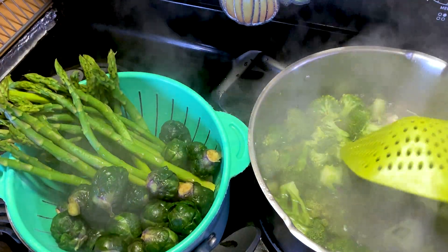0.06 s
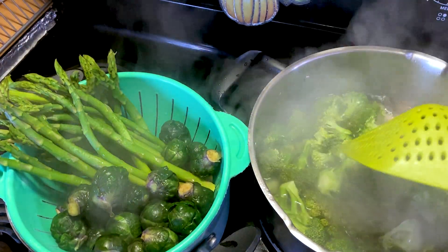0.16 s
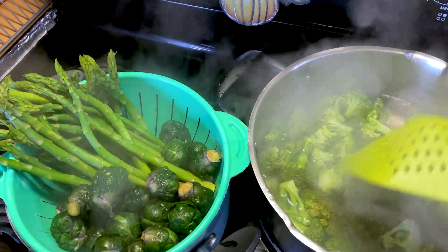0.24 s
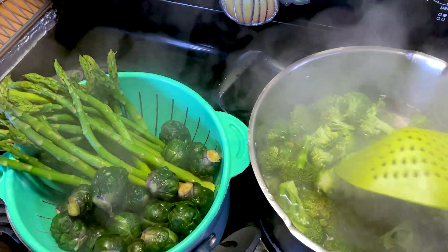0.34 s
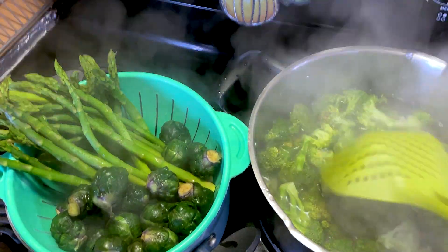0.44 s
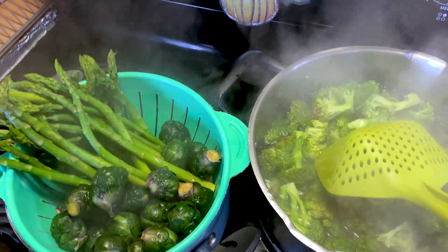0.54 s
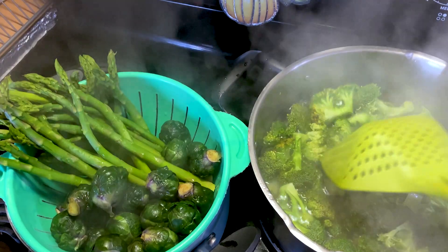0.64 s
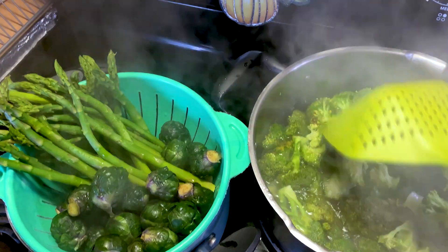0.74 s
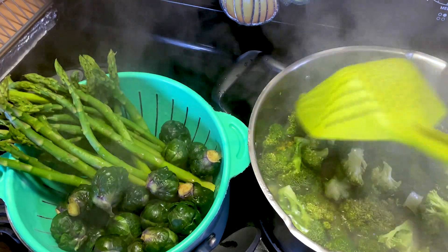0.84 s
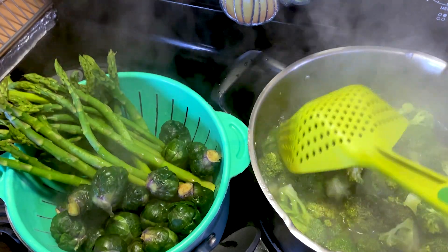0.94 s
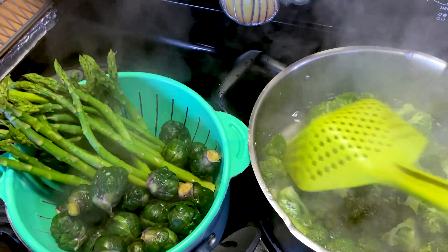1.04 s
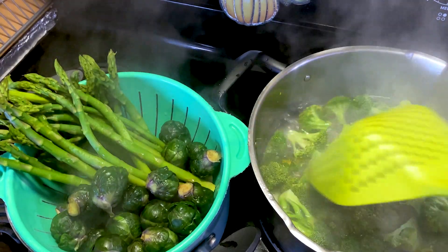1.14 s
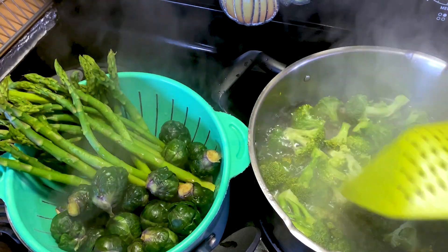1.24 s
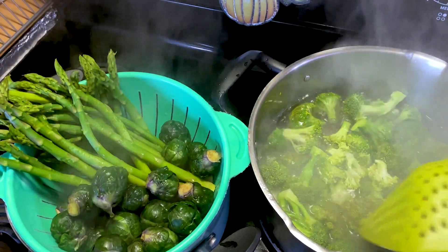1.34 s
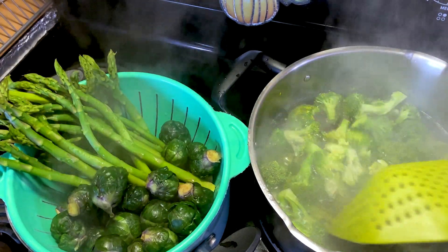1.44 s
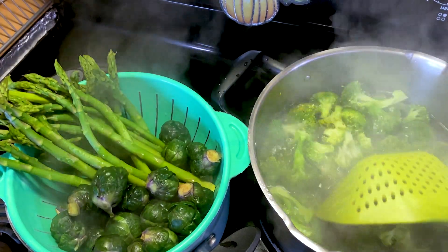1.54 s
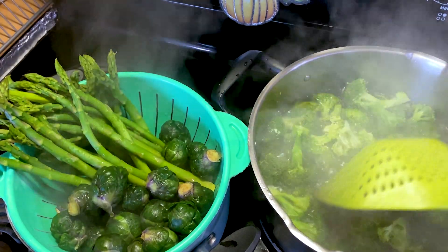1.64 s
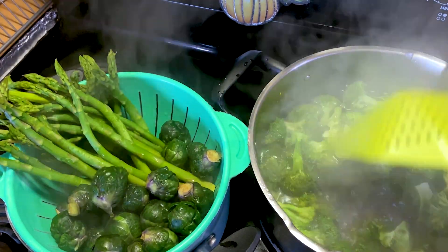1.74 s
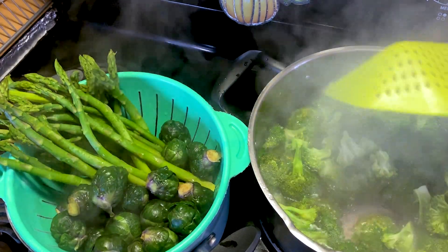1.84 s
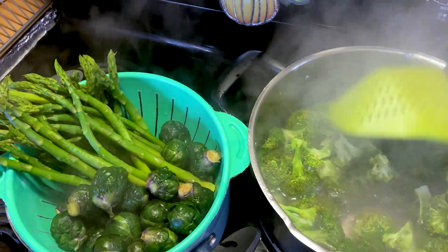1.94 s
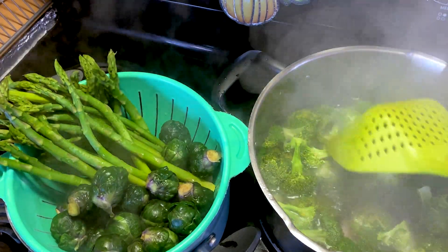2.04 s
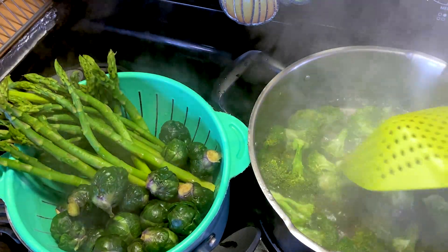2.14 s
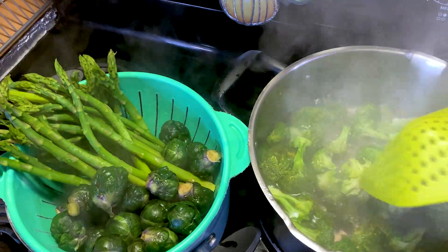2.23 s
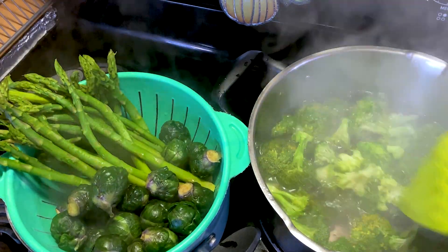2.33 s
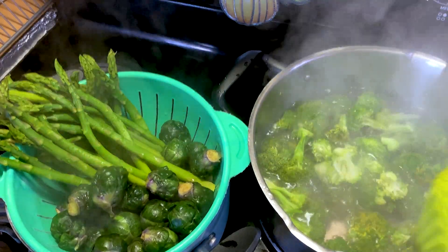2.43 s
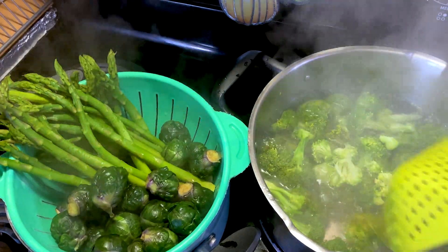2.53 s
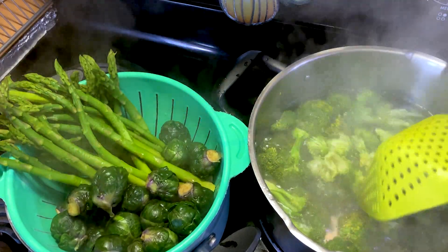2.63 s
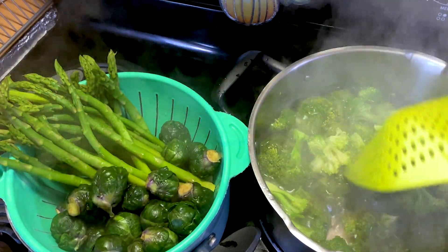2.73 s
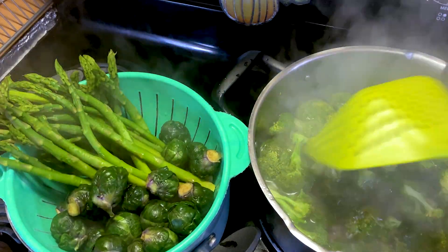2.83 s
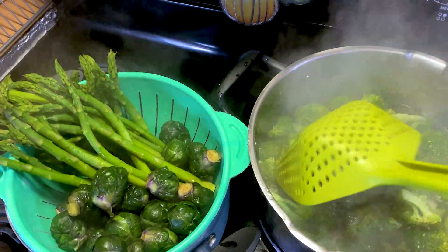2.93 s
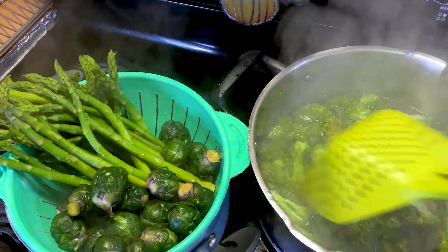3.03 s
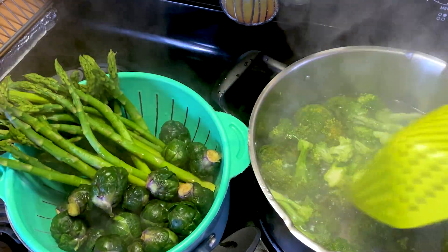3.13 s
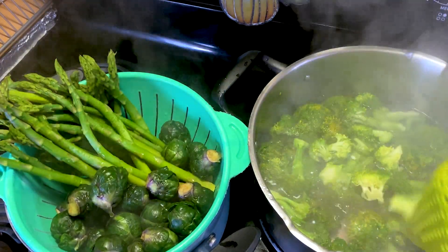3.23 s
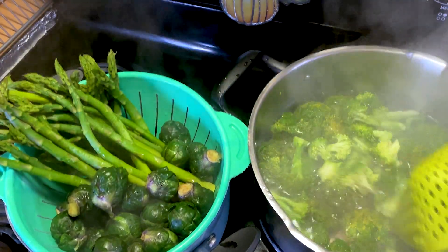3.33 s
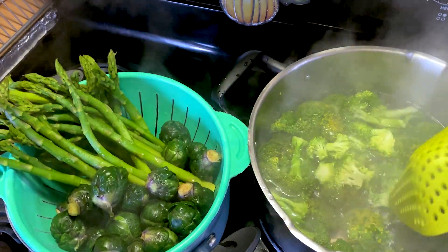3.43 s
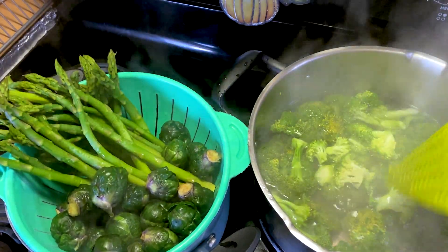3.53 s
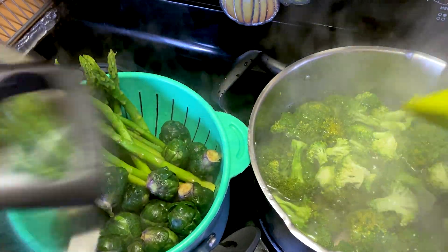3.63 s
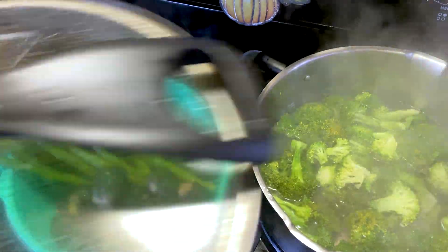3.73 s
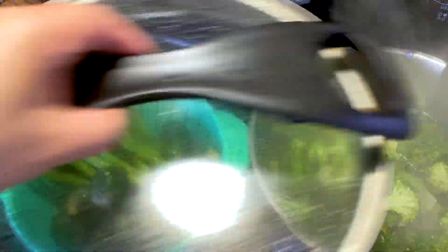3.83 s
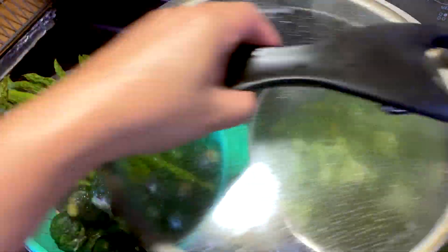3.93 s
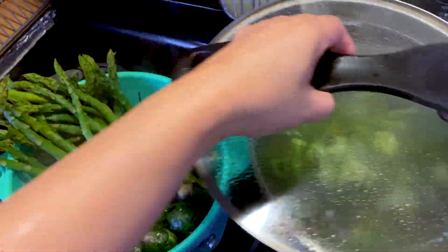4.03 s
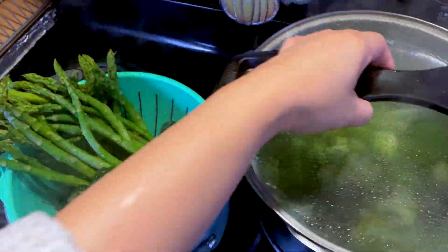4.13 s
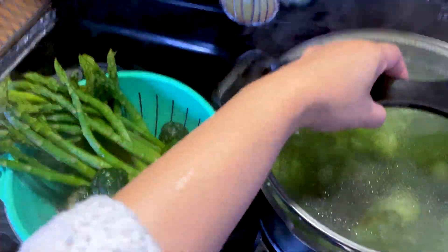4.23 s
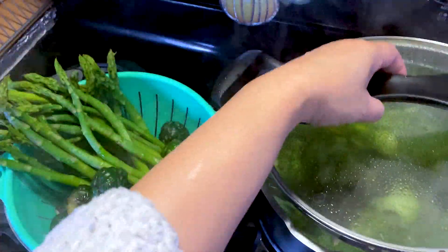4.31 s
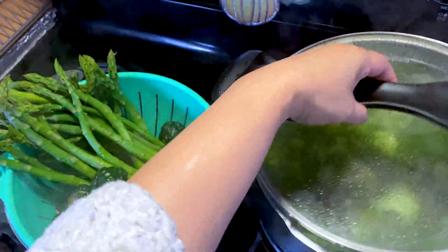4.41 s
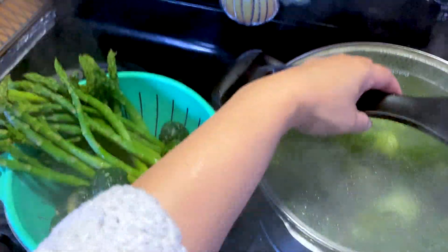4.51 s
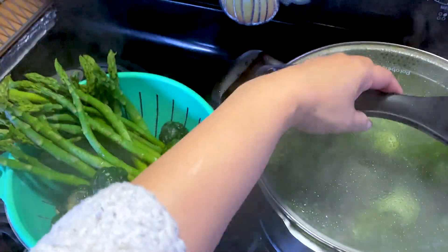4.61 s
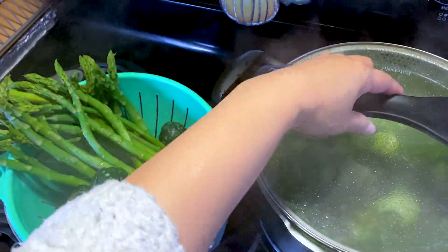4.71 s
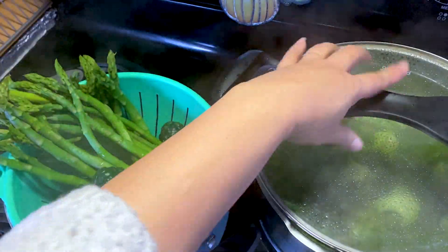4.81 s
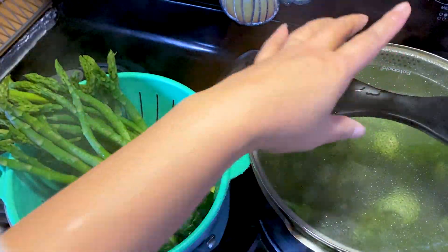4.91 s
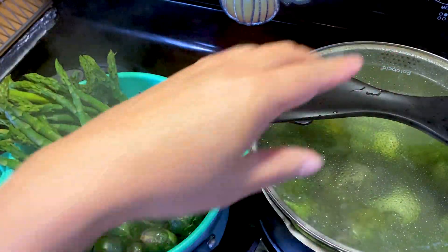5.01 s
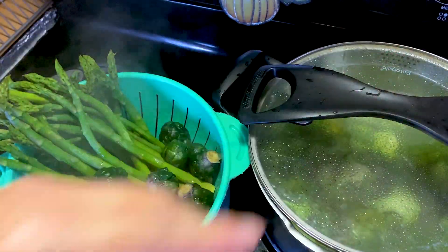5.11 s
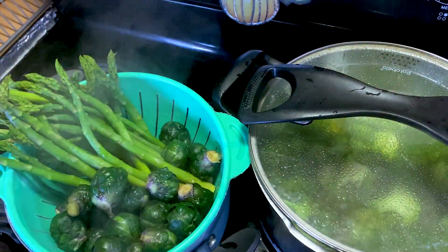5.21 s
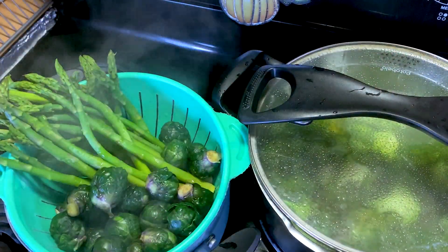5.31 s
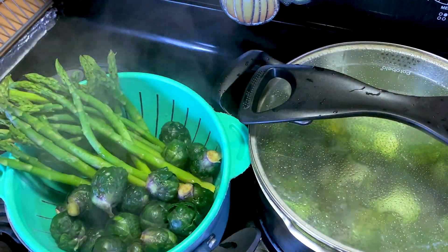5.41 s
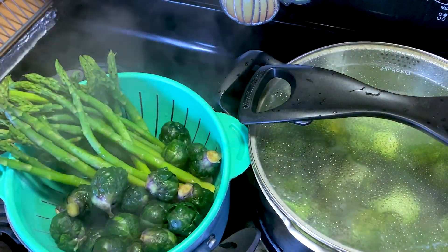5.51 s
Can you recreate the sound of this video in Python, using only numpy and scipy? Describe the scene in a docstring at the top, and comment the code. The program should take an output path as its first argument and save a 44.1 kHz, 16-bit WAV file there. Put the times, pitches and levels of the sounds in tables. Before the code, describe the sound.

A close stereo view of a steel pot simmering on a kitchen stove, with short room reverberation. Water seethes and bubbles throughout with a hollow pot resonance, over a faint low wavering drone; a fine froth fizz on top sinks from about 1.7 s. Tiny droplets spit on hot metal during the first two seconds. A plastic spoon knocks the pot at 0.47 s, then pushes water and rubs the wall with thin squeaks from 0.63 to about 1.2 s. Low glugs bubble around 0.8-1.1 s and again near 1.6 s, with a soft slosh at 1.45 s. Faint metal ticks come at 2.0, 3.0 and 5.5 s. The spoon double-knocks at 2.42 s and knocks once at 3.3 s. A lid clanks on the rim at 4.27 s, grinds at 4.5 s and drops loudly at 4.55 s with rapid weakening rattles. A muffled low rumble joins the slowly strengthening simmer until 5.6 s.

```python
"""Broccoli simmers in a steel pot: resonant bubble bursts, seething noise and, on top, a fizz of froth that sinks.
A plastic straining spoon stirs with shaped noise, squeaks as narrow-band noise and knocks on the pot's modes.
A glass lid lands on the rim, slides as flickering noise and drops into its seat; a resonance rumbles under it.
Hot metal ticks now and then as small modal blows; the stove drones low as coloured noise with two hums."""
import sys
import numpy as np
from scipy import signal
from scipy.fft import rfft, irfft
from scipy.io import wavfile

SR = 44100
rng = np.random.default_rng(int(sys.argv[2]) if len(sys.argv) > 2 else 0)


def generate_wav(sig):
    """Save sig (samples, or channels by samples) to the path in sys.argv[1] as 16-bit PCM at SR."""
    pcm = np.round(np.clip(np.atleast_2d(sig).T, -1, 1) * 32767).astype(np.int16)
    wavfile.write(sys.argv[1], SR, pcm)


N = 245189
TIME = np.arange(N) / SR
SEATED_S = 4.45   # from here on the lid lies in its seat


def from_db(db):
    """Level law: decibels to amplitude gain."""
    return np.exp(np.asarray(db) * (np.log(10) / 20))


def rms_one(x):
    """Normalisation to unit effective value (rms)."""
    return x / np.sqrt(np.mean(x ** 2) + 1e-20)


def level_in_time(rows):
    """Linear interpolation of a level curve, sample by sample."""
    s, db = np.transpose(rows)
    return np.interp(TIME, s, db)


def at_hz(points, hz, axis=1):
    """Interpolation of a spectrum on a logarithmic frequency axis."""
    points = np.array(points)
    return np.interp(np.log(hz), np.log(points[:, 0]), points[:, axis])


def pan(db):
    """Level difference between the channels: positive favours the left."""
    return from_db(np.array([[db], [-db]]) / 2)


def fade(t, t60):
    """Exponential decay: down 60 dB after t60 seconds."""
    return np.exp(-np.log(1000) * t / max(t60, 1e-3))


def add(out, s, sound):
    """Superposition: mix a sound in at time s."""
    start = max(round(s * SR), 0)
    out[:, start:start + sound.shape[-1]] += sound[..., :N - start]


def drift(rate, size=N):
    """Slow random modulation: straight lines between normal draws, rate per second."""
    knots = rng.standard_normal(1024)
    return np.interp(TIME[:size] * rate, np.arange(len(knots)), knots)


def resonate(x, hz, width_hz):
    """Damped resonator: a two-pole filter of unit gain at its peak."""
    r = np.exp(-np.pi * width_hz / SR)
    numerator = np.array([1, 0, -1]) * (1 - r * r) / 2
    denominator = [1, -2 * r * np.cos(2 * np.pi * hz / SR), r * r]
    return signal.lfilter(numerator, denominator, x + 1e-18)


# stereo image: f/Hz, left-right likeness/1, left-over-right level/dB
STEREO_IMAGE = [(40, 0.8, 2), (154, 0.75, -6), (314, 0.9, -2.5), (610, 0.39, -1.5), (1110, 0.28, 1.5),
                (2000, 0.23, -1.5), (4380, 0.088, 3.5), (7600, 0.29, -1.5), (10900, 0.13, -1.5)]
POT_LAG_S, LAG_ABOVE_HZ = 0.00045, 380   # travel time between the microphones, felt above the bass


def spread(pair, hz, from_left=False):
    """Interaural cues: two unrelated signals become left and right by coherence, delay and level."""
    alike = np.clip(at_hz(STEREO_IMAGE, hz), -.98, .98)
    lag = round(POT_LAG_S * SR * hz ** 2 / (hz ** 2 + LAG_ABOVE_HZ ** 2))
    common = np.sqrt(1 + alike) * pair[0]
    opposed = np.sqrt(1 - alike) * pair[1]
    lags = (0, lag) if from_left else (lag, 0)
    delayed = [np.pad(x, (late, 0))[:len(x)] for x, late in zip((common + opposed, common - opposed), lags)]
    return np.array(delayed) * pan(at_hz(STEREO_IMAGE, hz, axis=2))


# half-octave bands, narrowing to a fifth of an octave from 2 kHz
BAND_EDGES = np.concatenate([25 * 2 ** np.arange(0, 6.5, .5), 2000 * 2 ** np.arange(0, 3.2, .2)])
BANK = [(np.sqrt(low * high), signal.butter(2, [low, high], "band", fs=SR, output="sos"))
        for low, high in zip(BAND_EDGES, BAND_EDGES[1:])]


def bands(draws, low_hz=0, high_hz=SR, from_left=False):
    """Filter-bank analysis: yield (centre Hz, stereo band), two unrelated draws dealt in turn."""
    for k, (hz, sos) in enumerate(BANK):
        if low_hz <= hz <= high_hz:
            yield hz, spread(signal.sosfilt(sos, draws[k % 2]), hz, from_left)


def wash(spectrum, flicker_db, flicker_rate, size=N):
    """Coloured noise: stereo bands of a given spectral density flicker separately; rms 1."""
    total = 0
    for hz, band in bands(rng.standard_normal((2, 2, size)), spectrum[0][0], spectrum[-1][0]):
        total = total + band * from_db(at_hz(spectrum, hz) + flicker_db * drift(flicker_rate, size))
    return rms_one(total)


def pops(per_s, size_db):
    """Random impulse process: two trains of clicks of chance size and sign."""
    born = rng.random((2, N)) < per_s / SR
    sizes = from_db(size_db * np.minimum(rng.exponential(1, (2, N)), 4))
    return born * sizes * rng.choice([-1, 1], (2, N))


# low rumble of the stove: f/Hz, relative density/dB per Hz
STOVE_RUMBLE = [(25, -8), (40, -8), (55, 0), (75, -0.5), (105, 15), (150, -15), (250, -30)]
# hums within it: f/Hz, relative level/dB
STOVE_HUMS = [(49, -6), (67.5, -1.5)]
# swell of the drone, used about its mean: t/s, level/dB
STOVE_SWELL = [(0.0, -65), (0.79, -59), (1.93, -64.5), (2.35, -58.5), (4.4, -53.5), (5.56, -62)]
RUMBLE_DB, HUM_DB = -57, -56.5   # at the mean of the swell
RUMBLE_FOLLOWS, HUM_FOLLOWS = 0.21, 1.43   # share of the swell


def stove():
    """Modulation: low noise and two hums of wavering level and phase swell together."""
    drone_db = level_in_time(STOVE_SWELL)
    swing_db = drone_db - drone_db.mean()
    hum = 0
    for hz, db in STOVE_HUMS:
        wavering_gain = from_db(db + 3 * drift(7))
        hum = hum + wavering_gain * np.sqrt(2) * np.sin(2 * np.pi * hz * TIME + 1.2 * drift(6))
    rumble = wash(STOVE_RUMBLE, flicker_db=1.5, flicker_rate=4.28)
    rumble = from_db(RUMBLE_DB + RUMBLE_FOLLOWS * swing_db) * rumble
    return rumble + from_db(HUM_DB + HUM_FOLLOWS * swing_db) * hum * pan(-6.0)


KITCHEN_T60_S, KITCHEN_DB = 0.37, -10.5   # reverberation; its level against the clatter
RIGHT_LEAD_S = 0.00012   # the right microphone is nearer the pot


def ringing(modes, force, t, ring_pan_db):
    """Modal superposition: high modes of a round shell are close pairs that beat, differently at each microphone."""
    out = 0
    arrival = t - np.array([[RIGHT_LEAD_S], [0]])
    for (hz, db, t60), phase in zip(modes, rng.uniform(0, 2 * np.pi, (len(modes), 3, 1))):
        pairing = np.clip((hz - 1200) / 2000, 0, 1)
        main = np.sin(2 * np.pi * hz * arrival + phase[0] / 4) * pan(ring_pan_db * (1 - pairing))
        twin = pairing * np.sin(2 * np.pi * hz * 1.006 * t + phase[1:])
        kitchen = from_db(-20) * (1 - pairing) * fade(t, KITCHEN_T60_S)
        decay = (fade(t, t60) + kitchen) * (1 - np.exp(-1.5 * t * hz))
        out = out + from_db(db + at_hz(force, hz)) * (main + twin) / np.sqrt(1 + pairing ** 2) * decay
    return out


BASS_BELOW_HZ, TREBLE_ABOVE_HZ = 490, 2300   # a full blow adds bass, a hard edge adds treble
UNEVEN_DB, UNEVEN_STEP_HZ = 4.0, 70.04   # spread and spacing of the groups of dense modes


def dense_modes(size):
    """Statistical modal density: stereo noise in strong and weak groups above the bass; rms 1."""
    hz = np.arange(size // 2 + 1) * SR / size
    groups = np.interp(hz / UNEVEN_STEP_HZ, np.arange(1024), rng.standard_normal(1024))
    strength = from_db(UNEVEN_DB * np.clip(groups, -2, 2) * hz / (hz + BASS_BELOW_HZ))
    return rms_one(irfft(rfft(rng.standard_normal((2, 2, size))) * strength, size))


# limits of thud, body, clank, edge, snap and tick: f/Hz
ZONE_LIMITS = [100, 250, 450, 1300, 3000, 7500, 15000]
# dense short modes of wall, rim and grate: f/Hz, relative level/dB
DENSE_CLATTER = [(60, -6), (130, -5.5), (220, -11), (330, -8.5), (500, -7), (800, -1), (1150, -4),
                 (1700, -2), (3000, -3), (5200, -3.5), (6700, 3), (8000, -2), (11000, 2), (15000, -19)]
# boom of the closed pot on its grate: f/Hz, relative level/dB, t60/s before the rim's damping
CLOSED_POT_MODES = [(168, -2, .45), (221, 2, .2)]
SEATED_T60_S = 0.35   # once the lid lies flat the rim damps it
TREBLE_DAMPING_HZ = 16400
RATTLE_DB, RATTLE_PER_S = 2.0, 172.6   # the pot chatters on its grate as the dense modes die away


def blows(rows, shared_colour, modes, t60, clatter_db, modes_db, crack_db, build_cycles):
    """Impact excitation: contacts crack, clatter in dense modes, ring main ones and die away in the kitchen."""
    out, t = np.zeros((2, N)), TIME[:SR // 2]
    zones = np.sqrt(np.multiply(ZONE_LIMITS[1:], ZONE_LIMITS[:-1]))
    widths = np.diff(ZONE_LIMITS)
    bass = 1 / (1 + (zones / BASS_BELOW_HZ) ** 6)
    treble = 1 / (1 + (TREBLE_ABOVE_HZ / zones) ** 4)
    for s, level_db, bass_db, treble_db, ring_db in rows:
        seated = s > SEATED_S
        colour = shared_colour + bass_db * bass + treble_db * treble
        force = np.column_stack([zones, colour])
        density = np.column_stack([zones, colour + 10 * np.log10(SR / 2 / widths)])
        sound = from_db(modes_db + ring_db) * ringing(modes, force, t, ring_pan_db=-4.5)
        if seated:
            boom = from_db(-4.5) * ringing(CLOSED_POT_MODES, force, t, ring_pan_db=-12.0)
            sound = (sound + boom) * fade(t, SEATED_T60_S)
        rattle = from_db(RATTLE_DB * drift(RATTLE_PER_S, size=len(t)))
        # the lid seats on the left of the rim
        for hz, band in bands(dense_modes(len(t)) * rattle, from_left=seated):
            damping = 1 + hz / TREBLE_DAMPING_HZ   # the treble dies sooner
            crack = from_db(crack_db) * (hz / (hz + 5000)) ** 2 * fade(t, t60=.035)
            kitchen = from_db(KITCHEN_DB) * fade(t, KITCHEN_T60_S / np.sqrt(damping))
            shape = crack + fade(t, t60 / damping) + kitchen
            build = 1 - np.exp(-t / (build_cycles / hz + 0.0021))   # low notes take longer to build up
            sound += from_db(clatter_db + at_hz(density, hz) + at_hz(DENSE_CLATTER, hz)) * band * shape * build
        add(out, s, from_db(level_db) * sound)
    return out


# ticks of hot metal: t/s, relative level/dB, bass/dB, treble/dB, ring/dB
METAL_TICKS = [(1.996, -39.5, 5, -2, -13.5), (2.997, -37, -7.5, -0.09, -10), (5.477, -39.5, -2.5, 0.4, -10)]
# shared colour of the ticks: level/dB of thud, body, clank, edge, snap, tick
METAL_TICK_COLOUR = [-14, 0, 0, -12.5, -5.5, -9]
# modes of the pot, also rung by the spoon: f/Hz, relative level/dB, t60/s
POT_MODES = [(325, 3, 0.12), (351.6, -6, 0.27), (611, -9, 0.24), (718, -12, 0.28), (915, -2.5, 0.081),
             (990, -1, 0.062), (1081, 5, 0.095), (1212, -12, 0.057), (1650, 7, 0.05), (2670, -1, 0.1),
             (3955, -7.5, 0.14), (4660, -14, 0.27), (5900, -7, 0.21), (6650, 0.5, 0.23)]


def metal_ticks():
    """Impulse response: each tick of hot metal excites the pot's modes."""
    return blows(METAL_TICKS, METAL_TICK_COLOUR, POT_MODES, t60=0.22, clatter_db=-2.5, modes_db=0.0,
                 crack_db=7.0, build_cycles=1.9)


# droplets on hot metal: t/s, relative level/dB
SPATTER_DROPS = [(0.068, -41), (0.3995, -43.5), (0.9353, -44), (1.3365, -48), (1.651, -50.5), (2.1086, -45)]


def spatter(level_db, t60, low_hz):
    """Transient noise: droplets spit on the hot metal as bright bursts with a longer tail."""
    out, t = np.zeros((2, N)), TIME[:SR // 10]
    bright = signal.butter(2, [low_hz, 11000], "band", fs=SR, output="sos")
    for s, db in SPATTER_DROPS:
        snap = rng.standard_normal((2, len(t))) * (fade(t, t60) + from_db(-5.0) * fade(t, t60=.16))
        add(out, s, from_db(db + level_db) * signal.sosfilt(bright, snap))
    return out


# grinding of the lid on the rim: f/Hz, relative density/dB per Hz
SLIDE_SPECTRUM = [(200, 7), (350, 9), (700, 3), (1100, -1), (1500, -1), (2200, -5), (3500, -14),
                  (6600, -7.5), (9000, -21), (15000, -55)]
SLIDE_FROM_S, SLIDE_TO_S, SLIDE_DB = 4.478, 4.575, -29
SLIDE_ATTACK_S, SLIDE_T60_S = 0.045, 0.22


def sliding():
    """Sliding friction: the lid's steel band grinds over the rim in uneven jerks."""
    out, t = np.zeros((2, N)), TIME[:SR // 2]
    release = fade(np.maximum(SLIDE_FROM_S + t - SLIDE_TO_S, 0), SLIDE_T60_S)
    pressure = np.clip(t / SLIDE_ATTACK_S, 0, 1) * release
    grind = wash(SLIDE_SPECTRUM, flicker_db=5.0, flicker_rate=90, size=len(t))
    add(out, SLIDE_FROM_S, pressure * from_db(SLIDE_DB + 2.1 * drift(147, size=len(t))) * grind)
    return out


# the lid lands, skids and rattles into its seat: t/s, relative level/dB, bass/dB, treble/dB, ring/dB
LID_CONTACTS = [(4.268, -14, 1, 2, -0.64), (4.462, -43.5, -12, 20.5, -1), (4.476, -34, 2.5, 13.5, 0.62),
                (4.519, -30, 1, 13, -1.5), (4.553, -10, -2, -8.5, -1.4), (4.573, -15.5, 2, -8.5, 1),
                (4.592, -20.5, 2.5, -31, -0.27), (4.614, -26.5, -3.5, -6, -1)]
# shared colour of the lid's contacts: level/dB of thud, body, clank, edge, snap, tick
LID_CONTACT_COLOUR = [-2, -1, -1, -2.5, -10, -17]
# modes of the lid on the rim: f/Hz, relative level/dB, t60/s before the rim's damping
LID_RIM_MODES = [(308.7, -11.5, 0.4), (323.3, 4, 0.14), (349.4, -10, 0.29), (505.4, -12.5, 0.23),
                 (553.5, -8.5, 0.23), (773, -10.5, 0.13), (1001, -6, 0.2), (1106, 3.5, 0.26),
                 (1866, -18.5, 0.47), (1804, -4, 0.096), (2252, -11, 0.28), (2590, -14, 0.23),
                 (3217, -12.5, 0.33), (4250, -18, 0.4), (6700, -19, 0.2)]


def lid():
    """Modal impact and friction: the lid rings on the rim at each contact and grinds along it."""
    contacts = blows(LID_CONTACTS, LID_CONTACT_COLOUR, LID_RIM_MODES, t60=0.077, clatter_db=-2.0, modes_db=0.0,
                     crack_db=-26.0, build_cycles=0.88)
    return contacts + sliding()


# knocks of the spoon on the pot: t/s, relative level/dB, bass/dB, treble/dB, ring/dB
SPOON_KNOCKS = [(0.432, -39, 13.5, -6, -3.5), (0.474, -13.5, 5, 3.5, -7), (2.415, -16, -10.5, -1, 1),
                (2.45, -20.5, 4, 2.5, -10), (3.306, -14.5, -3.5, -0.5, -2)]
# shared colour of the knocks: level/dB of thud, body, clank, edge, snap, tick
SPOON_KNOCK_COLOUR = [-20.5, -9, 0, -10, -11.5, -29]


def spoon_knocks():
    """Impact excitation: the plastic spoon sets the steel pot's modes ringing."""
    return blows(SPOON_KNOCKS, SPOON_KNOCK_COLOUR, POT_MODES, t60=0.13, clatter_db=-1.5, modes_db=-1.5,
                 crack_db=8.0, build_cycles=1.3)


# strokes of the spoon: t/s, duration/s, push of water/dB, rub on the wall/dB, slosh/dB
SPOON_STROKES = [(0.642, 0.2, -47.5, -50, -65), (0.697, 0.5, -50.5, -59.5, -53.5),
                 (1.438, 0.25, -61, -62.5, -47), (3.027, 0.13, -62, -73, -49)]
# pushed water: f/Hz, relative density/dB per Hz
PUSH_SPECTRUM = [(45, 19), (75, 7), (150, 13), (200, 2), (300, -40)]
# rubbed wall: f/Hz, relative density/dB per Hz
RASP_SPECTRUM = [(1500, -8), (2200, -3), (3000, -2), (5000, 2), (6700, 5), (8200, -8), (12000, -7)]
# squeaks of the spoon's edge on the wall: t/s, duration/s, f/Hz, relative level/dB
EDGE_SQUEAKS = [(.63, .18, 1760, -52.5), (.65, .08, 3450, -62), (.735, .06, 2215, -53.5),
                (.71, .09, 4950, -58), (.76, .16, 5190, -65), (.95, .23, 5190, -65)]
STROKE_SKEW = 1.15   # a stroke gathers speed slowly and stops quickly


def stirring():
    """Flow noise and stick-slip: strokes push and slosh the water; the spoon's edge rasps and squeaks on the wall."""
    levels = 0
    for s, length, *levels_db in SPOON_STROKES:
        stroke = np.sin(np.pi * np.clip((TIME - s) / length, 0, 1) ** STROKE_SKEW)
        levels = levels + from_db(levels_db)[:, None] * stroke
    push, rub, slosh = levels
    out = push * wash(PUSH_SPECTRUM, flicker_db=2.5, flicker_rate=13.5)
    out += rub * wash(RASP_SPECTRUM, flicker_db=3.5, flicker_rate=65)
    out += slosh * wash(WATER_SPECTRUM, flicker_db=3.5, flicker_rate=32)
    for s, length, hz, db in EDGE_SQUEAKS:
        size = round(np.clip(length, .02, .5) * SR)
        note = rms_one(resonate(rng.standard_normal((2, SR // 2)), hz, width_hz=45))
        add(out, s, from_db(db + 4.5) * note[:, -size:] * np.sin(np.linspace(0, np.pi, size)))
    return out


COVERED_HZ, COVERED_WIDTH_HZ, COVERED_DB = 132, 40, -53


def covered():
    """Cavity resonance: bubbles rumble in the closed pot through two resonators in series."""
    once = resonate(pops(per_s=200, size_db=-1.0), COVERED_HZ, COVERED_WIDTH_HZ)
    twice = resonate(once, COVERED_HZ, 2 * COVERED_WIDTH_HZ)
    return (TIME > SEATED_S) * from_db(COVERED_DB) * rms_one(spread(twice, COVERED_HZ))


# big bubbles: t/s, relative level/dB, starting f/Hz
BIG_BUBBLES = [(0.758, -37, 119), (0.807, -37, 154), (0.998, -38.5, 161), (1.103, -33, 154),
               (1.559, -35.5, 344), (1.584, -33, 326)]


def glugs(level_db, t60, rise):
    """Bubble resonance: big bubbles swell, ring and rise a little in pitch as they surface."""
    out, t = np.zeros((2, N)), TIME[:SR // 4]
    for s, db, hz in BIG_BUBBLES:
        tone = np.sin(2 * np.pi * hz * t * (1 + rise * t)) * fade(t, t60) * (1 - np.exp(-t * hz))
        add(out, s, from_db(db + level_db) * tone * pan(-3.5))
    return out


# vigour of the simmer: t/s, level/dB before the offsets below
SIMMER_VIGOUR = [(0.0, -47), (0.13, -50.5), (1.46, -50), (1.87, -53.5), (2.6, -51), (4.2, -55)]
BUBBLING_DB = 2.5   # added to the vigour
FIZZ_DB, FIZZ_FOLLOWS = -61, 0.47   # level at mean vigour; share of its swing
FROTH_SINKS_S, FROTH_SINK_DB_PER_S, FROTH_LOSS_DB = 1.73, 2.5, 13   # start, rate and limit of the loss
REHEAT_DB_PER_S = 2.5   # under the lid the boil picks up again


def simmer():
    """Source strength: bubbling and fizz in dB follow the vigour, the froth sinks, the lid brings the heat back."""
    vigour_db = level_in_time(SIMMER_VIGOUR)
    reheat_db = REHEAT_DB_PER_S * np.maximum(TIME - SEATED_S, 0)
    sunk_db = np.clip(FROTH_SINK_DB_PER_S * (TIME - FROTH_SINKS_S), 0, FROTH_LOSS_DB)
    bubbling_db = BUBBLING_DB + vigour_db + reheat_db
    fizz_db = FIZZ_DB + FIZZ_FOLLOWS * (vigour_db - vigour_db.mean()) - sunk_db + reheat_db
    return bubbling_db, fizz_db


def bubbles(spectrum, pitches, per_s, size_db, cycles):
    """Bubble resonance: each burst excites a short ring at one of the pitches; rms 1."""
    clicks, dealt = pops(per_s, size_db), rng.integers(0, len(pitches), N)
    total = 0
    for k, hz in enumerate(pitches):
        ring = spread(resonate(clicks * (dealt == k), hz, 2 * hz / cycles), hz)
        total = total + from_db(at_hz(spectrum, hz)) / np.sqrt(hz) * ring
    return rms_one(total)


# seething water: f/Hz, relative density/dB per Hz
WATER_SPECTRUM = [(120, 6), (220, -5), (330, -3), (460, -4.5), (680, 1), (1000, -2), (1300, -9.5),
                  (1900, -11.5), (3000, -24.5), (5000, -22)]
# fine froth: f/Hz, relative density/dB per Hz
FIZZ_SPECTRUM = [(1500, 4), (2500, 1), (4000, -4), (5300, -8.5), (6700, 1), (8000, -8.5), (11000, -4),
                 (13000, -18.5), (15500, -10)]
# resonances of the air in the pot: f/Hz, bandwidth/Hz, relative level/dB
POT_AIR = [(326, 26, -1.5), (662, 52, -9), (947, 12, -12), (1642, 11, -16)]


def boil(bubbling_db, fizz_db):
    """Cavity excitation: bubbles over a seething wash sound the air in the pot; fine froth fizzes on top."""
    burble = bubbles(WATER_SPECTRUM, np.geomspace(280, 2600, num=16), per_s=350, size_db=2.6, cycles=14.8)
    bursts = pops(per_s=300, size_db=1.5)
    hollow = sum(from_db(db) * rms_one(spread(resonate(bursts, hz, width), hz)) for hz, width, db in POT_AIR)
    seething = wash(WATER_SPECTRUM, flicker_db=1.0, flicker_rate=12)
    water = from_db(-3.5) * seething + from_db(-6.0) * burble + from_db(-4.0) * hollow
    fizz = wash(FIZZ_SPECTRUM, flicker_db=-0.4, flicker_rate=8.3)
    return from_db(bubbling_db) * water + from_db(fizz_db) * fizz


def scene():
    """Linear superposition: stove, hot metal, lid, spoon and simmering water add up."""
    hot_metal = metal_ticks() + spatter(level_db=-3.5, t60=0.017, low_hz=3720)
    spoon = spoon_knocks() + stirring()
    water = covered() + glugs(level_db=1.0, t60=0.13, rise=0.46) + boil(*simmer())
    return stove() + hot_metal + lid() + spoon + water


def record(dry):
    """Saturation and band limit: loud peaks are rounded and the top is cut at 16.2 kHz."""
    rounded = 1.3 * np.tanh(dry / 1.3)
    return signal.sosfilt(signal.ellip(10, .2, 80, 16200, fs=SR, output="sos"), rounded)


dry = scene()
out = record(dry)
generate_wav(out)
```